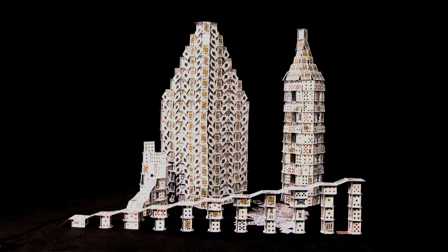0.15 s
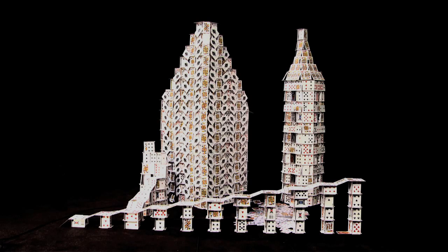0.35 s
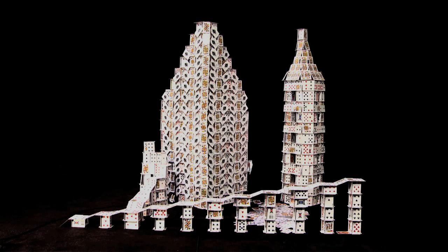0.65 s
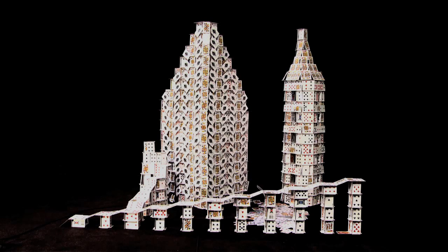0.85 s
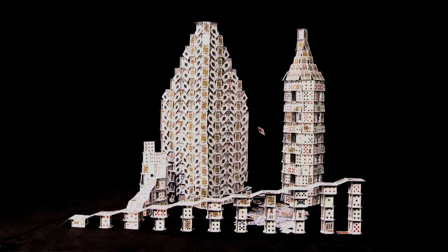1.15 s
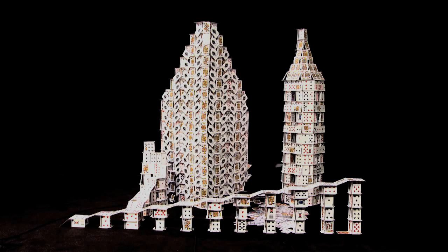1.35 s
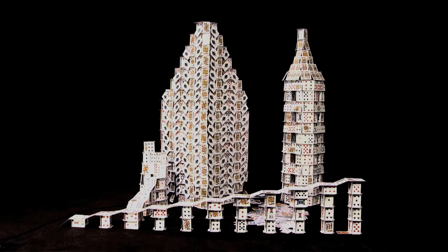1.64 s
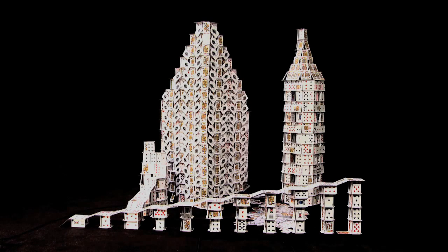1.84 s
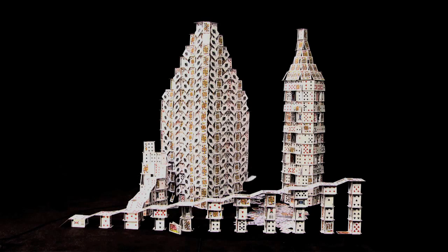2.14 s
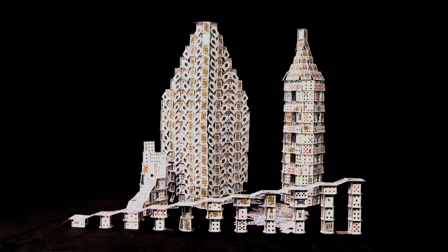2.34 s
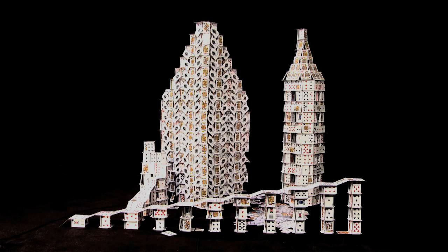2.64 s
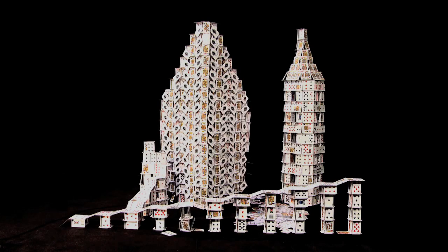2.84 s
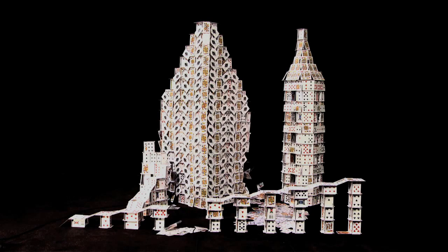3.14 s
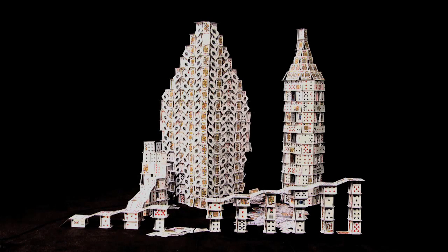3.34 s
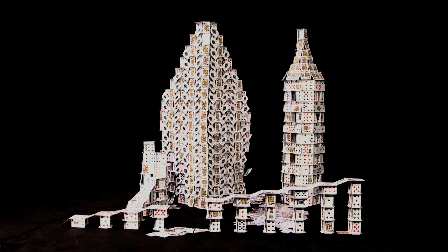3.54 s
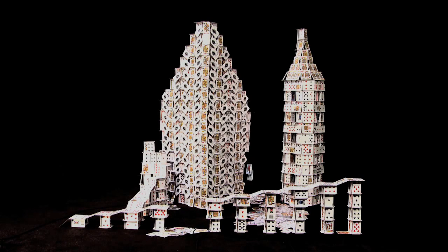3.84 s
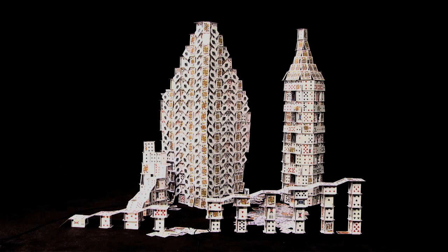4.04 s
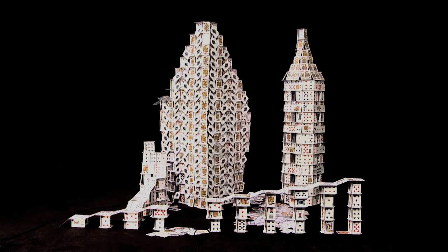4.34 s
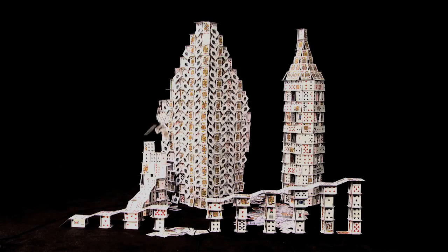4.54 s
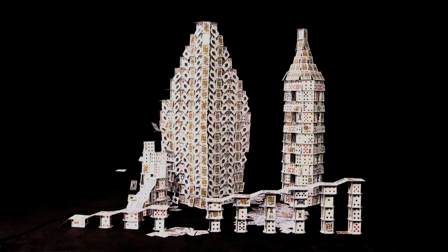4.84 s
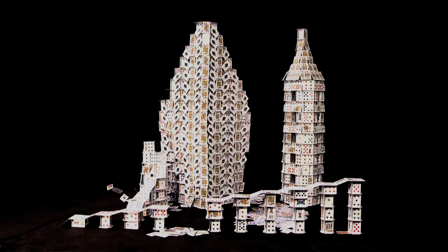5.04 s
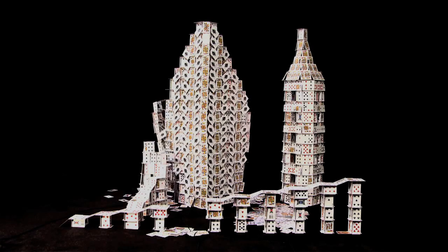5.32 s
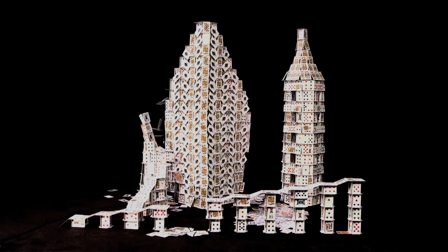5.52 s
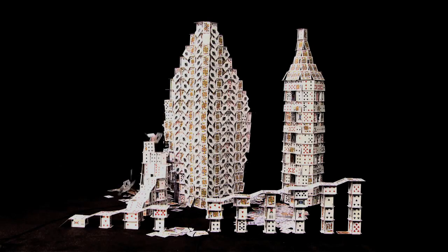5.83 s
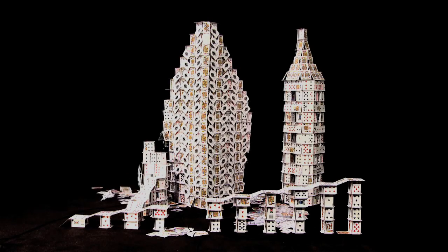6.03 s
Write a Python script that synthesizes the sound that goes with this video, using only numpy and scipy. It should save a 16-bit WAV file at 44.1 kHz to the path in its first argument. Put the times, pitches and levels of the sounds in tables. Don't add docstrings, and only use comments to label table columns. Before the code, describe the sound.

Playing cards slip and tick from a tall card tower, sparse clicks thickening into hollow papery clatter over low ventilation hum in a quiet hall.

```python
import sys
import numpy as np
from scipy import signal
from scipy.fft import rfft, irfft, next_fast_len
from scipy.io import wavfile
from scipy.ndimage import uniform_filter1d

SR = 44100
rng = np.random.default_rng(int(sys.argv[2]) if len(sys.argv) > 2 else 0)


def voltage_ratio(level):
    return 10 ** (np.asarray(level, float) / 20)


def dump(signal):
    limited = np.clip(np.atleast_2d(signal).T, -1, 1)
    pcm = np.round(limited * 32767).astype(np.int16)
    wavfile.write(sys.argv[1], SR, pcm)


N = 272538
EDGE_HZ = 4600


def rms_one(x):
    return x / np.sqrt(np.mean(x ** 2) + 1e-20)


def in_time(rows):
    s, *columns = np.transpose(rows)
    return [np.interp(np.arange(N) / SR, s, column) for column in columns]


def bins(size):
    return np.maximum(np.arange(size // 2 + 1), .5) * SR / size


def at_hz(points, hz):
    points_hz, values = np.array(points).T
    return np.interp(np.log(hz), np.log(points_hz), values)


def causal(db):
    cepstrum = irfft(db * np.log(10) / 20, axis=-1)
    half = cepstrum.shape[-1] // 2
    cepstrum[..., 1:half] *= 2
    cepstrum[..., half + 1:] = 0
    return np.exp(rfft(cepstrum, axis=-1))


def bump(hz, centre_hz, octaves):
    return 1 / (1 + (np.log2(hz / centre_hz) / octaves) ** 2)


def band(x, low_hz, high_hz):
    return signal.sosfilt(signal.butter(3, [low_hz, high_hz], "band", fs=SR, output="sos"), x)


def drift(rate_hz):
    knots = rng.standard_normal(2000)
    return rms_one(np.interp(np.arange(N) / SR * rate_hz, np.arange(2000), knots))


# frequency in Hz, level in dB per Hz.
AIR_RUSH = [(8.8, -11), (15, 4.5), (54, -12), (80, -9.5), (120, -14), (273, -27.5), (355, -34),
            (388, -31.5), (535, -42), (584, -36.5), (934, -65.5), (1220, -67), (2460, -62), (15100, -59.5),
            (16500, -71)]
# centre in Hz, width in Hz, level in dB rms.
DUCT_RINGS = [
    (44.4, 13.6, -41),
    (120.16, 5.1, -47.5),
    (213.2, 10.3, -61),
]
# time in seconds, pitch in Hz, level in dB rms.
MOTOR_HUM = [
    (0.0, 175.9, -54),
    (1.62, 182.2, -47),
    (2.31, 176.2, -71),
    (6.18, 178.9, -46.5),
]


def ventilation():
    size = next_fast_len(N)
    hz = bins(size)
    rush = irfft(rfft(rng.standard_normal(size)) * voltage_ratio(at_hz(AIR_RUSH, hz)), size)[:N]
    air = voltage_ratio(-39) * rms_one(rush)
    for centre_hz, width_hz, level_db in DUCT_RINGS:
        ring = rfft(rng.standard_normal(size)) / (1 + (2 * (hz - centre_hz) / width_hz) ** 2)
        air += voltage_ratio(level_db) * rms_one(irfft(ring, size)[:N])
    hum_hz, hum_db = in_time(MOTOR_HUM)
    hum = np.sqrt(2) * voltage_ratio(hum_db) * np.sin(2 * np.pi * np.cumsum(hum_hz) / SR)
    return air + hum


# frequency in Hz, level in dB per Hz.
CARD_PAPER = [(120, -15.5), (200, -4), (480, -0.5), (900, -5), (1500, -7), (2500, -13), (2900, -19.5),
              (4200, -26), (5600, -22.5), (8500, -23), (12500, -24), (17500, -28)]
# centre in Hz, width in octaves, gain in dB.
CAPSULE = [
    (2350, .12, 4),
    (4600, .045, -8),
    (5150, .04, 3),
    (10800, .06, 6),
    (15000, .07, 4),
]


def card_colour(hz):
    top_db = -12 / (1 + (16100 / hz) ** 100)
    capsule_db = sum(db * bump(hz, centre_hz, octaves) for centre_hz, octaves, db in CAPSULE)
    return at_hz(CARD_PAPER, hz) + top_db + capsule_db


# time in seconds, level in dB.
LOOSE_LEVEL = [(0.0, -55), (0.25, -64.5), (1.1, -60.5), (2.0, -61), (2.6, -60), (3.2, -57), (3.5, -60.5),
               (4.0, -59.5), (4.6, -60.5), (5.0, -53), (5.5, -54.5), (5.75, -49), (6.18, -49.5)]
# loudest
# moment in seconds, length in seconds, level in dB, edge share in dB.
CARD_SLIDES = [(0.63, 0.11, -57.5, -5.5), (0.901, 0.11, -43, -13), (1.246, 0.11, -55, -5.5),
               (1.39, 0.06, -60.5, -4), (1.762, 0.15, -50, -3), (2.287, 0.3, -55.5, -12),
               (2.854, 0.38, -52, -8.5), (3.153, 0.3, -46.5, -6.5), (3.35, 0.52, -49.5, -9.5),
               (3.688, .16, -44, -10), (4.21, 0.24, -51.5, -10), (4.41, 0.26, -53, -8),
               (4.82, 0.6, -49, -11), (4.97, 0.13, -40.5, -19), (5.303, 0.13, -42.5, -13.5),
               (5.52, 0.27, -44.5, -13), (5.902, 0.19, -36, -6), (5.99, .2, -42.5, -20)]
EDGE_FOLLOWS, EDGE_DB = 1.45, -73
HOLLOW_FOLLOWS, HOLLOW_DB = 0.47, -56.5
SLIDE_RISE, SLIDE_FADE = 0.31, 0.23


def loose_cards():
    t = np.arange(N) / SR
    (tumble_db,) = in_time(LOOSE_LEVEL)
    faces = voltage_ratio(2 * tumble_db)
    edges = voltage_ratio(2 * (EDGE_DB + EDGE_FOLLOWS * (tumble_db + 60)))
    for loudest_s, length_s, level_db, edge_db in CARD_SLIDES:
        past = (t - loudest_s) / length_s
        decay = np.where(past < 0, (past / SLIDE_RISE) ** 2, past / SLIDE_FADE)
        swell = voltage_ratio(2 * level_db) * np.exp(-decay)
        faces = faces + swell
        edges = edges + voltage_ratio(2 * edge_db) * swell
    body_db = 10 * np.log10(faces)
    return body_db, 10 * np.log10(edges), HOLLOW_DB + HOLLOW_FOLLOWS * (body_db + 60)


def tumble():
    body_db, edge_db, hollow_db = loose_cards()
    born = rng.random((2, N)) < 3000 / SR
    force = voltage_ratio(1.54 * np.minimum(rng.exponential(1, (2, N)), 5))
    grains = born * force * rng.choice([-1, 1], (2, N))
    size = next_fast_len(N)
    paper = irfft(rfft(grains, size) * causal(card_colour(bins(size))), size)[:, :N]
    clumps_db = 1.12 * drift(45)
    face = voltage_ratio(body_db - 3.0 + clumps_db) * rms_one(band(paper[0], 1300, EDGE_HZ))
    edge = voltage_ratio(edge_db - 3.0 + .6 * clumps_db) * rms_one(band(paper[1], EDGE_HZ, 20000))
    hollow = voltage_ratio(hollow_db - 3.0 + 2.5 * drift(18)) * rms_one(band(paper[1], 250, 1300))
    return face + edge + hollow


def flexing(hz, events, low_hz, high_hz):
    modes_hz = low_hz * (high_hz / low_hz) ** rng.random((events, 4, 1))
    return 4 * bump(hz, modes_hz, .06).sum(axis=1)


def strike(times, peak_db, length_s, colour_db, rise_s, first, size=4096):
    t = np.arange(size) / SR
    draws = rng.standard_normal((len(times), 2, size))
    swell = (1 - np.exp(-t / rise_s)) * np.exp(-t / np.clip(length_s, 3e-4, .03)[:, None])
    chatter = draws[:, 0] * voltage_ratio(3.5 * draws[:, 1]) * swell
    chatter[:, round(rise_s * SR)] += first
    blow = np.zeros_like(chatter)
    blow[:, 0] = np.sqrt(np.sum(chatter ** 2, axis=1)) * np.sign(draws[:, 0, 0])
    rung = irfft(rfft([chatter, blow]) * causal(colour_db))
    loudest = np.sqrt(uniform_filter1d(rung[0] ** 2, size=66, axis=1).max(axis=1))
    rung *= (voltage_ratio(peak_db) / loudest)[:, None]
    out = np.zeros((2, N + size))
    for k, s in enumerate(times):
        start = round(s * SR)
        out[:, start:start + size] += rung[:, k]
    return out[:, :N]


# start in seconds, peak in dB, ring of the edge in Hz.
EDGE_TICKS = [(0.066, -46, 9340), (0.9358, -45, 14200), (1.074, -59, 11000), (1.7025, -51, 13000),
              (1.733, -22, 14600), (2.0512, -48, 15300), (2.2, -47, 7100), (2.257, -48, 11200),
              (2.345, -43, 10800), (3.167, -28.5, 10900), (3.1906, -35, 15400), (3.2944, -45, 11000),
              (3.347, -33.5, 7540), (3.3872, -37, 10600), (3.4342, -31.5, 12000), (3.6608, -28.5, 6270),
              (3.776, -44, 11700), (4.16, -41, 10900), (4.3236, -41, 10800), (4.344, -44, 10700),
              (4.544, -40.5, 11300), (4.916, -38, 10300), (4.955, -35, 10100), (5.1048, -43, 10800),
              (5.2904, -38, 6430), (5.497, -38, 10700), (5.6965, -48, 6830), (5.743, -39, 7000),
              (5.752, -49, 8000)]
RIM_HZ = 10700


def ticks():
    knock_s, _, _, edge_db, _ = contacts()
    before_knocks = list(zip(knock_s - .0006, edge_db, RIM_HZ + 0 * edge_db))
    s, peak_db, ring_hz = np.transpose(before_knocks + EDGE_TICKS)
    hz = bins(4096)
    colour_db = card_colour(hz) - 45 / (1 + (1.25 * hz / EDGE_HZ) ** 8)
    colour_db = colour_db + flexing(hz, len(s), 5100, 15450)
    colour_db += 1.4 * bump(hz, ring_hz[:, None], 0.19)
    length_s = np.full(len(s), .0038)
    return strike(s - .0004, peak_db - 13.0, length_s, colour_db, rise_s=0.00047, first=4.3)


# start in seconds, peak in dB,
# cell pitch in Hz, edge level in dB, contact length in seconds.
HEAVY_BLOWS = [(0.158, -30, 1610, -38.5, 0.0035), (0.806, -26, 2260, -33, 0.011),
               (0.813, -21, 1380, -22.5, 0.017), (1.627, -33, 1040, -48, .014),
               (1.722, -26, 3140, -19.5, 0.0031), (2.74, -32.5, 1550, -42.5, 0.02),
               (3.069, -22, 2350, -25.5, 0.0039), (3.153, -26, 2240, -40, 0.008),
               (3.162, -25, 850, -35, .003), (3.647, -20, 1360, -61, 0.0028),
               (3.657, -18.5, 920, -65, 0.0083), (3.026, -33, 1510, -37, .001),
               (4.701, -27.5, 1340, -35, 0.0062), (4.758, -24.5, 2150, -29.5, 0.0087),
               (4.972, -25, 3150, -31.5, 0.0054), (5.372, -29, 1940, -32, 0.015),
               (5.44, -28, 513, -41, 0.0064), (5.486, -22.5, 2200, -28, 0.005),
               (5.63, -21.5, 660, -37.5, 0.0042), (5.771, -30, 720, -59, 0.018),
               (5.823, -20, 630, -44, .004), (5.878, -13, 960, -25, 0.0044),
               (6.153, -18.5, 606, -43, 0.0078), (6.162, -19, 622, -32, 0.0055)]
# start in seconds, peak in dB, cell pitch in Hz, edge level in dB.
FACE_SLAPS = [(0.47, -47, 2260, -73), (1.185, -48, 1450, -64), (2.191, -43.5, 1320, -50),
              (2.246, -36, 2300, -41.5), (2.277, -40, 2270, -45), (2.498, -43.5, 1750, -58),
              (2.877, -45, 2300, -62), (3.082, -44, 2230, -45), (3.108, -35, 2520, -36),
              (3.115, -35, 1350, -30), (3.142, -33, 2320, -38), (3.2, -36.5, 1380, -35),
              (3.229, -39, 2200, -42), (4.309, -33.5, 2220, -55), (3.376, -36.5, 1500, -49),
              (3.4, -31.5, 1230, -38.5), (4.598, -36.5, 2310, -48), (4.633, -37, 2320, -53),
              (4.779, -50, 2150, -37), (4.845, -40, 1790, -41), (4.867, -35.5, 1410, -55),
              (4.906, -37, 3000, -37), (4.921, -36, 2130, -52), (4.98, -35.5, 2980, -40),
              (5.146, -33.5, 2290, -37), (5.157, -35.5, 1230, -35.5), (5.226, -31, 2000, -36),
              (5.297, -33.5, 1680, -34.5), (5.594, -35, 1540, -51), (5.963, -31, 1650, -49)]
# start in seconds, peak in dB, cell pitch in Hz, edge level in dB.
HOLLOW_KNOCKS = [(0.587, -47, 611, -48), (0.888, -35, 1010, -37.5), (0.94, -38.5, 1140, -50),
                 (1.224, -42, 960, -49), (1.722, -31, 1520, -60), (1.355, -45, 616, -50),
                 (1.605, -38, 503, -74), (1.621, -38.5, 810, -47), (1.638, -32, 1400, -42),
                 (2.361, -34.5, 774, -47), (3.67, -30, 1530, -56), (3.21, -34, 485, -62),
                 (3.284, -32.5, 940, -52), (3.419, -32.5, 885, -35), (3.625, -30, 1030, -34),
                 (3.978, -43.5, 790, -48), (4.043, -40.5, 1120, -41.5), (4.112, -37.5, 840, -44.5),
                 (4.151, -44, 710, -47), (4.33, -34.5, 756, -53), (4.392, -35, 876, -70),
                 (4.494, -33, 960, -61), (4.555, -37, 780, -75), (4.633, -36, 1050, -47),
                 (4.946, -30, 890, -36), (4.975, -34.5, 840, -50), (4.997, -30.5, 874, -64),
                 (5.029, -37, 720, -65), (5.25, -28.5, 825, -40), (5.523, -32, 925, -54)]
# start in seconds, peak in dB, cell pitch in Hz, edge level in dB.
WING_CAVE_IN = [(5.639, -25, 790, -60), (5.677, -30.5, 990, -35), (5.747, -36, 870, -45),
                (5.786, -25.5, 816, -49), (5.804, -26.5, 604, -52), (5.837, -31.5, 900, -43),
                (5.859, -23.5, 685, -58), (5.876, -15.5, 2060, -19), (5.893, -40, 1010, -38),
                (5.924, -26, 925, -40), (6.101, -30, 780, -47), (6.166, -18.5, 650, -64),
                (6.173, -18.5, 890, -45)]
SLAP_S, KNOCK_S, CAVE_S = 0.013, 0.0055, 0.0081


def contacts():
    rows = list(HEAVY_BLOWS)
    for kind, length_s in [(FACE_SLAPS, SLAP_S), (HOLLOW_KNOCKS, KNOCK_S), (WING_CAVE_IN, CAVE_S)]:
        rows += [tuple(row) + (length_s,) for row in kind]
    return np.transpose(rows)


SNAP_DB, SNAP_FOLLOWS = -9.5, 0.79
THUMP_DB, THUMP_DB_PER_OCTAVE = -14.0, -2
CELL_DB, CELL_OCTAVES = 12.5, 0.18


def knocks():
    s, peak_db, cell_hz, edge_db, length_s = contacts()[:, :, None]
    snap_db = SNAP_DB + SNAP_FOLLOWS * (edge_db - peak_db)
    thump_db = THUMP_DB + THUMP_DB_PER_OCTAVE * np.log2(cell_hz / 1000)
    hz = bins(4096)
    colour_db = card_colour(hz) - 20 / (1 + (1.2 * EDGE_HZ / hz) ** 8)
    colour_db = colour_db + CELL_DB * bump(hz, cell_hz, CELL_OCTAVES)
    colour_db += (snap_db + 23.0) / (1 + (2700 / hz) ** 8)
    colour_db += flexing(hz, len(s), 715, 4330)
    colour_db += (thump_db + 10.0) / (1 + (hz / 600) ** 4)
    return strike(s[:, 0] - .001, peak_db[:, 0] - 6.5, length_s[:, 0], colour_db, rise_s=.001, first=6.1)


# frequency in Hz, time to fall by 60 dB in seconds.
HALL_DECAY = [
    (300, 0.6),
    (900, 0.45),
    (2300, 0.18),
    (5500, 0.16),
    (14000, 0.13),
]
HALL_DB, HALL_GAP_S = -8.5, 0.011


def hall(x):
    t = np.arange(SR) / SR
    edges = 125 * 2. ** np.arange(8)
    tail = np.zeros(SR)
    for low_hz, high_hz in zip(edges, np.append(edges[1:], 21000)):
        fade = voltage_ratio(-60 * t / at_hz(HALL_DECAY, 1.4 * low_hz))
        tail += band(rng.standard_normal(SR), low_hz, high_hz) * fade
    tail *= np.clip(t / HALL_GAP_S - .3, 0, 1)
    return voltage_ratio(HALL_DB) * signal.fftconvolve(x, tail / np.sqrt(np.sum(tail ** 2)))[:N]


def scene():
    direct, blows = knocks() + ticks() * voltage_ratio([[0], [4.0]])
    diffuse = hall(blows) + tumble() + ventilation()
    top = signal.ellip(10, 1, 50, 15800, fs=SR, output="sos")
    return (direct + signal.sosfilt(top, diffuse))[None]


def band_limit(x):
    return signal.sosfilt(signal.butter(12, 16740, fs=SR, output="sos"), x)


def record(dry):
    cut = signal.cheby2(12, 40, 16900, fs=SR, output="sos")
    mix = signal.sosfilt(cut, dry)
    return band_limit(mix)


dry = scene()
out = record(dry)
dump(out)
```